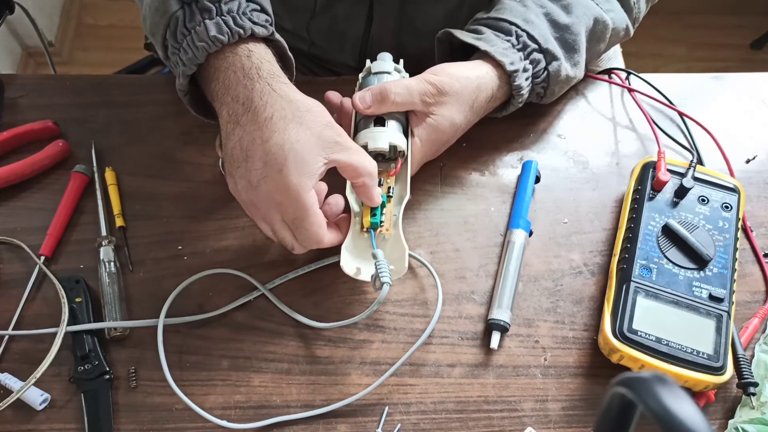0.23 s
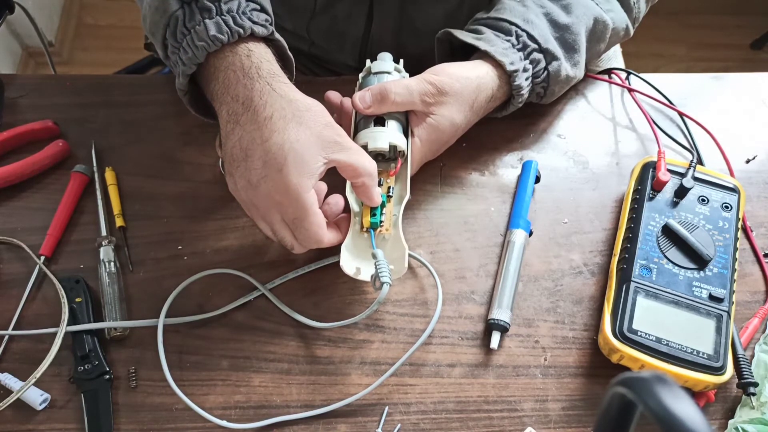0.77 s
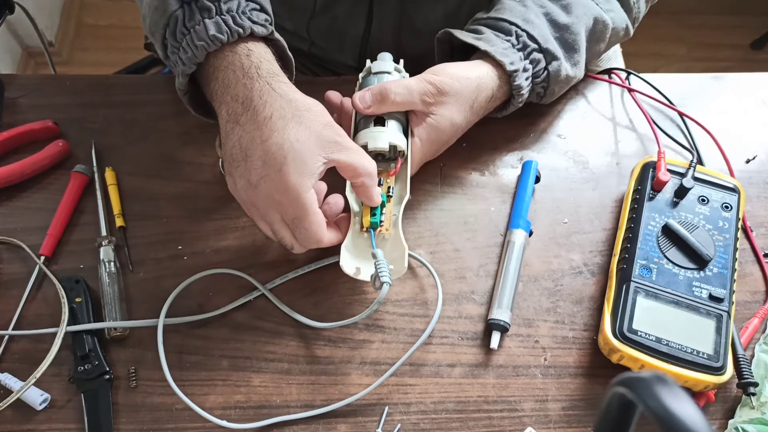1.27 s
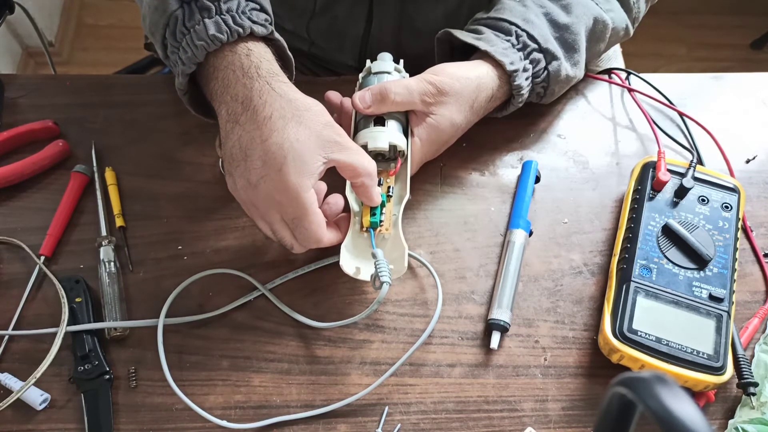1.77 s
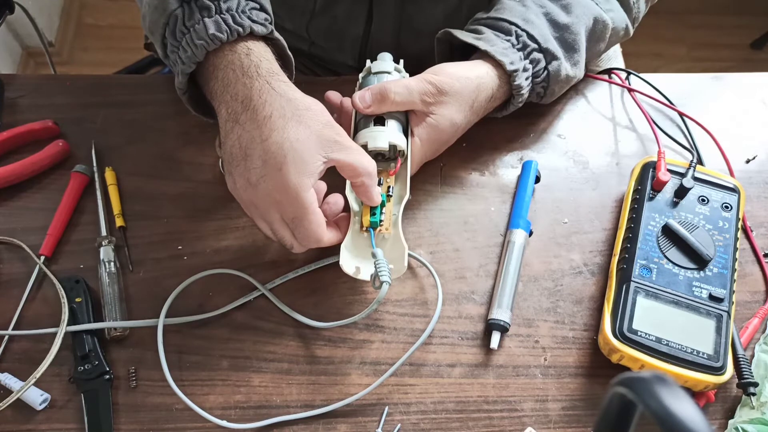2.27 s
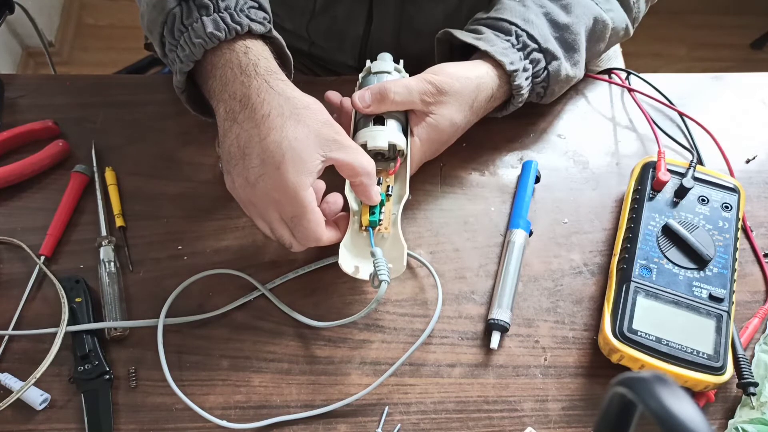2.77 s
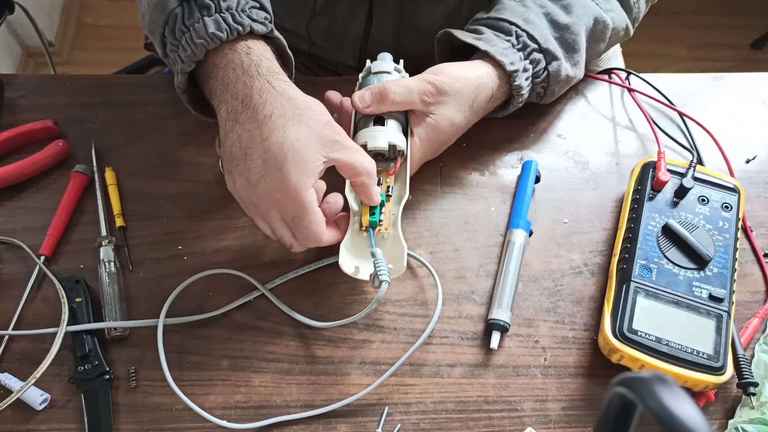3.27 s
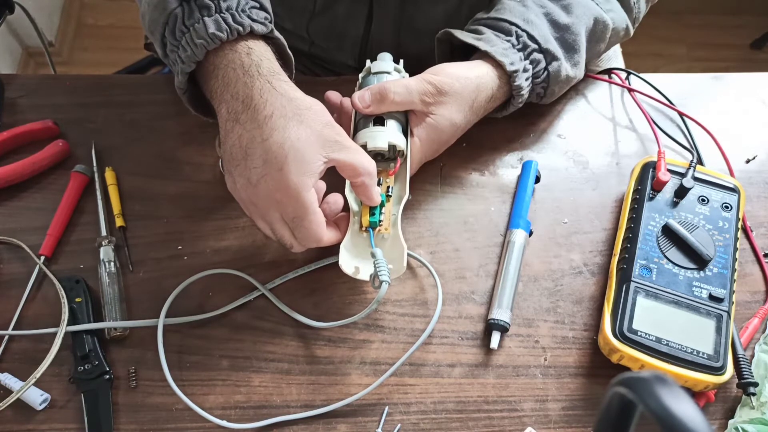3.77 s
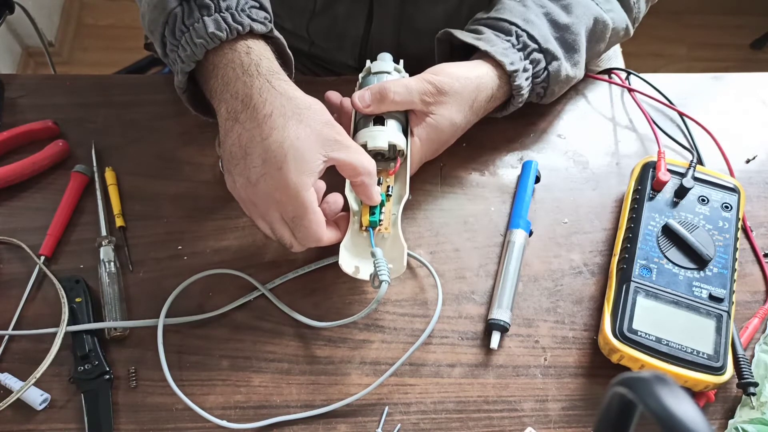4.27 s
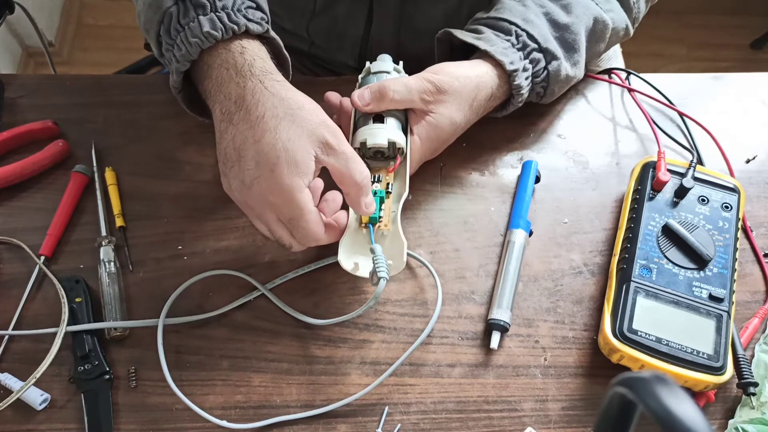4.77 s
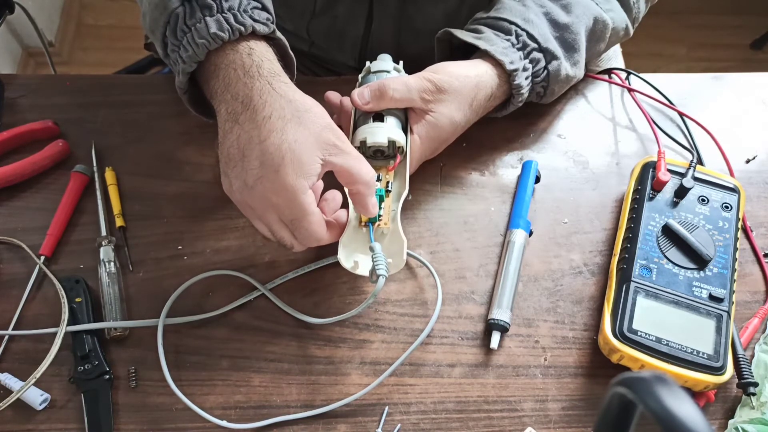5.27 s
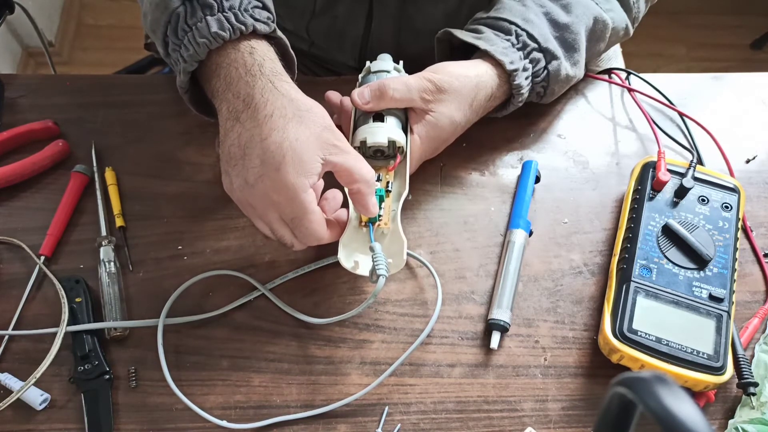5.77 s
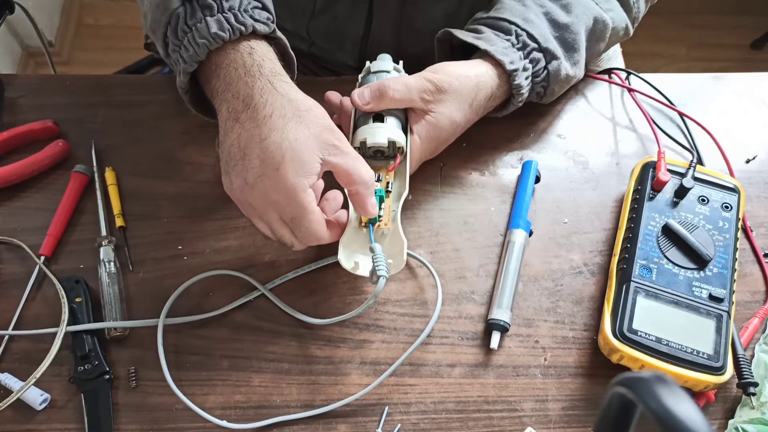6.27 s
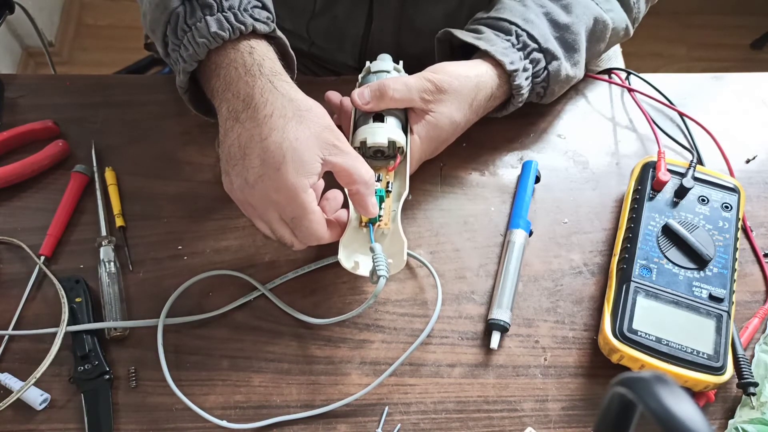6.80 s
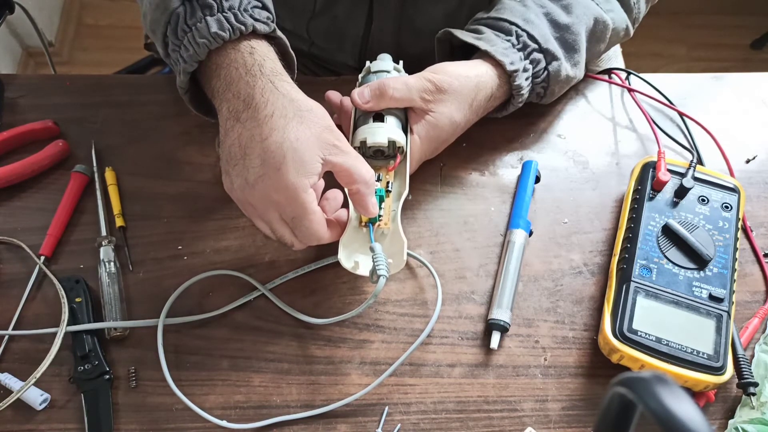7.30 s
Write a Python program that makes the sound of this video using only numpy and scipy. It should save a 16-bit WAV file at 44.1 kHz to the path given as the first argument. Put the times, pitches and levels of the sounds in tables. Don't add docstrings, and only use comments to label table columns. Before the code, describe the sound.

A bare hand blender motor on a workbench whirs in three pulses, rattling harshly during the first, with button clicks and falling whines between.

```python
import sys
import numpy as np
from scipy import signal
from scipy.fft import rfft, irfft, next_fast_len
from scipy.io import wavfile

SR = 44100
rng = np.random.default_rng(int(sys.argv[2]) if len(sys.argv) > 2 else 0)


def persist_wave(psi):
    counts = np.round(np.clip(psi, -1, 1) * 32767).astype(np.int16)
    wavfile.write(sys.argv[1], SR, np.atleast_2d(counts).T)


def invert_db(level):
    return 10 ** (np.asarray(level, dtype=float) / 20)


N = 332514
T = np.arange(N) / SR
SIZE = next_fast_len(N + SR)
HZ = np.fft.rfftfreq(SIZE, 1 / SR)
MAINS_HZ = 100
LOOSE_S, TIGHT_S = 1.025, 2.69

# [on/s, off/s, speed after the first jerk/(turns/s), speed it heads for/(turns/s), run-up/s]
PRESSES = [
    (0, 2.688, 126.9, 210.6, .449),
    (3.412, 4.385, 88.3, 209.8, .402),
    (5.845, 6.34, 19.6, 170.3, .711),
]


def evened(x):
    return x / np.sqrt(np.mean(abs(x) ** 2) + 1e-20)


def read(points, hz, count=1):
    p = np.transpose(points)
    return np.interp(np.log(hz + 1), np.log(p[0] + 1), p[count])


def gains(table):
    return [(k, invert_db(db)) for k, db in table]


def shape(x, response):
    return irfft(rfft(x, SIZE) * response, SIZE)[..., :N]


def wander(hz):
    return evened(shape(rng.standard_normal(N), 1 / (1 + (HZ / hz) ** 4)))


def between(on, off, edge=.012):
    return np.clip(np.minimum(T - on, off + edge - T + (off == T[-1])) / edge, 0, 1)


def powered():
    return sum(between(on - .01, off) for on, off, *_ in PRESSES)


def shaft_speed():
    # [speed one second before rest/(turns/s), power]
    coasts = [
        (116.6, 1.589),
        (96.8, 1.721),
        (72.6, 2.298),
    ]
    stretch, jerk_s = .924, .04
    freed_turns, freed_s = 1.63, .15
    speed = np.zeros(N)
    for (on, off, first, top, rise), (scale, power) in zip(PRESSES, coasts):
        s = np.clip(T, on, off)
        freed = freed_turns * (1 - np.exp(-np.maximum(s - LOOSE_S, 0) / freed_s)) * (on < LOOSE_S)
        driven = top - (top - first) * np.exp(-((s - on) / rise) ** stretch) + freed
        time_left = (driven / scale) ** (1 / power) - np.maximum(T - off, 0)
        spin = scale * np.maximum(time_left, 0) ** power
        speed += np.clip((T - on) / jerk_s + (on == 0), 0, 1) * (spin - speed)
    return speed


def loudness(count):
    # [speed/(turns/s), shaft orders/dB, brush hiss/dB, air fizz/dB]
    by_speed = [(8, -85, -67, -92), (16.7, -50.5, -49, -68), (49, -54.5, -43, -63), (97, -47.5, -44.5, -59),
                (120.4, -45.5, -43.5, -56.5), (149.3, -42, -40, -54), (184.6, -38.5, -36.5, -52),
                (214, -35, -35, -49)]
    # [level/dB] for orders, hiss, fizz
    coasting_db = [-0.5, 0.5, -2]
    # [level/dB] for orders, hiss, fizz
    loose_db = [2, 1, 6]
    loose_fade_s = .6
    loose = between(LOOSE_S, T[-1]) * np.exp(-np.maximum(T - TIGHT_S, 0) / loose_fade_s)
    db = read(by_speed, shaft_speed(), count)
    db = db + coasting_db[count - 1] * (1 - powered()) + loose_db[count - 1] * loose
    return invert_db(db + 0.05 * wander(hz=16))


def shell(count, between_db):
    # [f/Hz, width/Hz, level when shaken/dB, level when knocked/dB]
    resonances = [(537, 174, -19, -21), (765, 59, -5.5, 5), (878, 74, -4.5, -16), (1085, 116, -3, 17.5),
                  (1530, 128, 1, 11.5), (1775, 128, 1.5, -19), (2246, 165, -2, 17), (2690, 225, 3.5, -12),
                  (2945, 590, 1, -8.5), (3820, 660, 2.5, -15), (4560, 570, 1, -26), (5310, 210, -3.5, -19),
                  (6100, 1800, -9.5, -19), (7943, 210, 11.5, -6), (7967, 150, 5.5, -24.5),
                  (8414, 84, 8.5, 6)]
    modes = sum((-1) ** k * invert_db(m[count]) / (1 + 2j * (HZ - m[0]) / m[1]) for k, m in enumerate(resonances))
    response = (modes + invert_db(between_db)) * HZ ** 2 / (HZ ** 2 + 300 ** 2)
    return response / np.sqrt(np.mean(abs(response[HZ < 9000]) ** 2))


def orders(turns, table, flutter_db, flutter_hz, scatter=1):
    power = sum(gain ** 2 / 2 for k, gain in table)
    drift = [invert_db(flutter_db * wander(flutter_hz)) for _ in range(8)]
    lines = 0
    for i, (k, gain) in enumerate(table):
        cycles = round(2 * k) / 2 * turns + .012 * k ** 2 + scatter * rng.random()
        lines = lines + gain * drift[i % 8] * np.cos(2 * np.pi * cycles)
    return lines / np.sqrt(power)


def shaft_shake(turns):
    # [order, level/dB]
    low_orders = [(1, -30), (2, -28), (3, -55), (4, -1.5), (5, -6.5), (6, -1.5), (7, -5), (8, -1.5),
                  (9, -2.5), (10, -3), (11, -8), (12, -3.5), (13, -4.5), (14, -9.5), (15, -7.5), (16, -6),
                  (17, -11.5), (18, -9), (19, -10.5), (20, -11.5), (21, -16), (22, -32.5), (23, -12)]
    upper = [(k, -13. - 6 * rng.random()) for k in range(26, 47)] + [(3, -4.), (26, -9), (27, -9)]
    tight = 1 - between(LOOSE_S, TIGHT_S)
    lines = orders(turns, gains(list(low_orders[:21]) + upper), flutter_db=2.2, flutter_hz=5.9)
    return shape(invert_db(-0.5) * loudness(count=1) * tight * lines, shell(count=2, between_db=-58))


def lit(hz):
    # [f/Hz, width/Hz, level/dB]
    crossed = [(1050, 300, -53), (1480, 260, -56), (1760, 140, -56), (2090, 220, -55), (2570, 160, -43.5),
               (3130, 340, -43.5), (3820, 330, -36), (4180, 320, -38), (4600, 360, -41.5), (5550, 340, -37),
               (6300, 600, -33), (7300, 520, -32), (8400, 450, -33)]
    return np.sqrt(sum((invert_db(db) / (1 + (2 * (hz - at) / width) ** 2)) ** 2 for at, width, db in crossed))


def commutator_whine(turns, speed):
    # [order, level/dB]
    bar_lines = [
        [(22, -7), (23, -1.5), (24, -1), (25, -17)],
        [(47, -1), (48, -1), (49, 7)],
        [(72, 0)],
    ]
    bar_db = [0, -14.5, -27.5]
    overtones_from = 68
    current = powered()
    ripple = 1 + 0.13 * np.cos(2 * np.pi * MAINS_HZ * T) * current
    side = np.clip((speed - 145) / (190 - 145), .45, 1) * (0.74 + (1 - 0.74) * current)
    whine = 0
    for n, (db, bars) in enumerate(zip(bar_db, bar_lines)):
        table = [(k, g * (side if k % 24 else 1)) for k, g in gains(bars)]
        strength = invert_db(db) * lit(24 * (n + 1) * speed) * np.minimum(speed / overtones_from, 1) ** (1.5 * n)
        whine = whine + strength * orders(turns, table, flutter_db=2.8, flutter_hz=40)
    return ripple * whine


def brush_hiss(turns, speed):
    scrape = 1 + 0.28 * np.cos(2 * np.pi * turns)
    hiss = invert_db(-3.0) * 1.077 * loudness(count=2) * scrape * rng.standard_normal(N)
    slow = np.clip(1 - speed / 161, 0, 1)
    notch = 1 - 1.6 / (1 + ((HZ - 5050) / 350) ** 2)
    open_air = notch / (1 + (3600 / (HZ + 1)) ** 4) / (1 + (HZ / 8600) ** 12)
    return shape((1 - slow) * hiss, shell(count=2, between_db=-58)) + invert_db(-8.5) * shape(slow * hiss, open_air)


def fizz():
    # [f/Hz, level/dB]
    air = [(8600, -9), (9500, -10), (10700, -11), (11300, -22), (11650, 0), (14000, -3), (15000, -5),
           (15800, -9)]
    a, b, c = shape(rng.standard_normal((3, N)), (HZ > 8600) * invert_db(read(air, HZ)))
    return invert_db(1.0) * loudness(count=3) * evened(np.array([a + 0.4 * c, b - 0.64 * c]))


def hum():
    hum_db = [-48.5, -50, -60.5]
    pull = sum(invert_db(db) * between(on - .01, off) for db, (on, off, *_) in zip(hum_db, PRESSES))
    sag_db = -5.5 * shaft_speed() / PRESSES[0][3]
    return np.sqrt(2) * pull * invert_db(sag_db + 1.65 * wander(hz=12)) * np.cos(2 * np.pi * MAINS_HZ * T)


def background():
    # [t/s, level/dB]
    swells = [
        (0.0, -52),
        (0.99, -54),
        (1.43, -49),
        (2.79, -44),
        (3.1, -46.5),
        (5.88, -49),
        (6.6, -52.5),
        (7.48, -52.5),
        (7.54, -42),
    ]
    # [f/Hz, level/dB]
    drone_tones = [(122.5, -58), (165, -65), (185, -70), (232, -62), (247.6, -66), (285.3, -69), (340, -70)]
    # [f/Hz, correlation]
    likeness = [(60, 0.68), (180, 0.66), (550, 0.38), (1650, 0.18), (4970, 0.33), (15000, -0.57)]
    # [f/Hz, level per Hz/dB]
    noise_floor = [(20, -34), (59, -15), (100, -6), (141, -15), (227, -4), (500, -21), (720, -26),
                   (5000, -46), (6600, -41), (8500, -47), (9000, -50), (11300, -53), (11700, -41),
                   (15800, -40)]
    a, b = rfft(rng.standard_normal((2, SIZE)))
    same = np.clip(read(likeness, HZ), -1, 1)
    z = np.array([a, same * a + np.sqrt(1 - same ** 2) * b]) * invert_db(read(noise_floor, HZ))
    low = 1 / (1 + (HZ / 500) ** 2)
    scale = 1 / np.std(irfft(z, SIZE))
    swell = invert_db(np.interp(T, *np.transpose(swells)))
    rumble = irfft(z * low, SIZE)[:, :N] * scale * swell * invert_db(-6.5)
    hiss = irfft(z * (1 - low), SIZE)[:, :N] * scale * invert_db(-51.5)
    fade_db = -1 * between(6.13, T[-1], edge=.4)
    drone = 0
    for hz, db in drone_tones:
        strength = invert_db(db + (hz < 200) * fade_db + 3.5 * wander(hz=2.5))
        cycles = np.cumsum(hz * (1 + .012 * wander(hz=1.2))) / SR
        drone = drone + strength * np.cos(2 * np.pi * cycles)
    return rumble + hiss + drone


def knocks(turns):
    # [order, level/dB]
    settling_orders = [(1, -7.5), (2, -24), (3, -12), (4, -3), (5, -52), (6, -2.5), (7, 10), (8, 14),
                       (9, 10.5), (10, -4), (11, -7), (12, 7.5), (13, 5), (14, 7), (15, 6), (16, -9),
                       (17, 6.5), (18, 10), (19, -23), (20, -2), (21, -32), (22, -20), (23, 9), (24, -63),
                       (25, 1), (26, -31), (27, -17), (28, -20.5), (29, -21), (30, -2.5)]
    # [order, level/dB]
    settled_orders = [(1, -9.5), (2, -23.5), (3, -6.5), (4, 2), (5, 0), (6, -21), (7, -8.5), (8, -11),
                      (9, -45), (10, -24), (11, 10), (12, -6), (13, -7), (14, -6), (15, -41), (16, 0.5),
                      (17, -29), (18, -14), (19, -9), (20, -0.5), (21, 0), (22, 3.5), (23, -8), (24, 4),
                      (25, -18), (26, -3), (27, -35), (28, -7), (29, -12), (30, -7)]
    # [order, level/dB]
    half_orders = [(5.5, -11), (8.5, -4), (10.5, -1.5), (11.5, -10.5), (12.5, -9), (13.5, 2.5), (14.5, -14),
                   (15.5, -18), (16.5, -21), (17.5, -44), (18.5, -26), (19.5, -47), (20.5, -19),
                   (21.5, -19), (22.5, 5), (23.5, -42), (31, -28), (32, -7), (35, -2), (36, -13.5),
                   (38, -57), (38.5, 8.5), (39, -32), (40, -39)]
    settled = 0.9 - (0.9 - 0.14) * np.exp(-np.maximum(T - LOOSE_S, 0) / 0.47)
    whole = [(k, early + settled * (late - early))
             for (k, early), (_, late) in zip(gains(settling_orders), gains(settled_orders))]
    half = [(k, gain * (0.52 + 0.28 * settled)) for k, gain in gains(half_orders)]
    lines = orders(turns, whole + half, flutter_db=1.8, flutter_hz=10, scatter=.3)
    grow_db = 0.98 * (T - LOOSE_S)
    locked = between(LOOSE_S, TIGHT_S) * invert_db(-34.5 + grow_db) * lines

    turn = np.round(turns).astype(int)
    count = turn.max() + 1
    size = invert_db(1.1 * rng.standard_normal(count))[turn] * (1 + 0.4 * (-1.) ** turn)
    off = turns - turn + .004 * rng.standard_normal(count)[turn]
    blow = np.sinc(84 * off) * np.exp(-(off / 0.45) ** 2)
    rattle = .15 * np.exp(-(turns % 1) / 0.35) * rng.standard_normal(N)
    force = between(LOOSE_S, T[-1]) * invert_db(-31.5 - 250 * np.maximum(T - TIGHT_S, 0))
    light = 1 / (1 + (3000 / (HZ + 1)) ** 4)
    return locked + shape(force * size * (evened(blow) + rattle), shell(count=3, between_db=-10.0) * light)


def switch():
    # [t/s, peak level/dB, low rings/dB, middle rings/dB, high rings/dB]
    clicks = [
        (3.412, -38.5, 13, -8, 13.5),
        (5.843, -27, 3.5, -2, 4.5),
        (6.342, -16.5, 7, 4.5, -7),
              (1.028, -34, 12, -8, -14),
        (2.69, -34, 8, -6, -10),
        (4.386, -27, 6, 2, -6),
    ]
    # [f/Hz, level/dB, t60/s]
    button_rings = [(1100, -7.5, 0.0035), (2015, -5.5, 0.022), (2450, 9, 0.0039), (3410, -21, 0.022),
                    (6060, 5, 0.0072), (7630, 7, 0.0086), (8560, -29, 0.0077), (12800, -45, .01)]
    out, t = np.zeros(N + SR), np.arange(7000) / SR
    for s, db, low_db, mid_db, high_db in clicks:
        rings = 0
        for hz, ring_db, t60 in button_rings:
            band_db = low_db if hz < 3000 else mid_db if hz < 6600 else high_db
            cycles = hz * rng.uniform(0.94, 1.07) * t + rng.random() / (2 * np.pi)
            rings = rings + invert_db(ring_db + band_db - 60 * t / t60) * np.sin(2 * np.pi * cycles)
        decay = invert_db(-60 * t / 0.013) + invert_db(-24 - 60 * t / .14)
        crack = 2.4 * invert_db(high_db) * decay * np.diff(rng.standard_normal(len(t) + 1))
        snap = .5 * invert_db(db) * (rings + crack) * (1 - np.exp(-(t / 0.0011) ** 2))
        for late, part in ((0, 1), (.011, 0.29), (.014, .22)):
            at = round((s + late) * SR)
            out[at:at + len(t)] += part * snap
    return out[:N]


def room(x):
    # [f/Hz, t60/s]
    decay_times = [(300, 0.18), (2000, 0.87), (8000, 0.38), (15000, 0.013)]
    taps = np.zeros((2, SR // 2))
    at = np.arange(120, SR // 2 - 20, 20) + rng.integers(0, 20, (2, (SR // 2 - 121) // 20))
    np.put_along_axis(taps, at, rng.choice([-1., 1.], at.shape), 1)
    hz, t, z = signal.stft(taps, SR, nperseg=256)
    decay = invert_db(-60 * t / np.maximum(read(decay_times, hz), .03)[:, None])
    tail = signal.istft(z * decay, SR, nperseg=256)[1]
    return shape(x, rfft(tail / np.linalg.norm(tail[0]), SIZE))


def scene():
    # [f/Hz, level/dB, left minus right/dB]
    mic = [(100, 3.5, -8), (414, 4, 9.5), (597, 3, -1.5), (1660, 0, 1.5), (2950, 2.5, 0), (4870, 3.5, 0.5),
           (6550, 10, -4.5), (8020, 7.5, 4.5), (8510, 0, 19), (8980, -25, 42.5), (10150, -20, 33),
           (11400, -44, -3), (11900, -3, -7), (15600, -7, 7)]
    speed = shaft_speed()
    turns = np.cumsum(speed * (1 + 0.0006 * wander(hz=29.6))) / SR
    motor = shaft_shake(turns) + commutator_whine(turns, speed) + brush_hiss(turns, speed) + knocks(turns)
    near = motor + switch()
    lead = np.exp(2j * np.pi * HZ * np.array([[1], [-1]]) * 2.6e-5)
    heard = shape(near, lead) + invert_db(-10) * room(near)
    ports = invert_db(read(mic, HZ) + np.array([[.5], [-.5]]) * read(mic, HZ, count=2))
    return shape(heard, ports) + fizz() + hum() + background()


def top_cut(x):
    return signal.sosfilt(signal.butter(12, 16670, fs=SR, output="sos"), x)


def record(dry):
    return top_cut(dry)


dry = scene()
out = record(dry)
persist_wave(out)
```